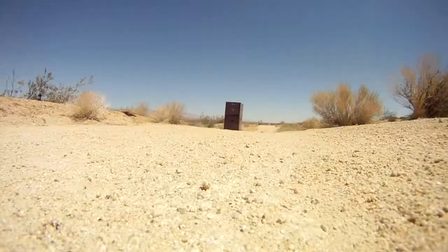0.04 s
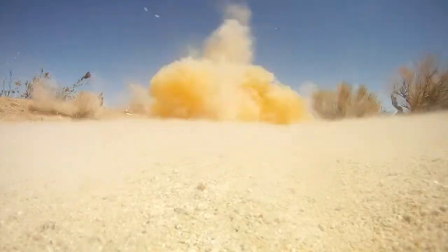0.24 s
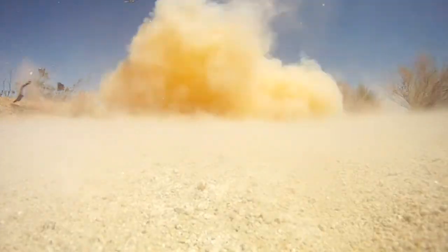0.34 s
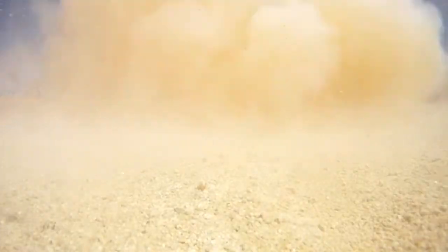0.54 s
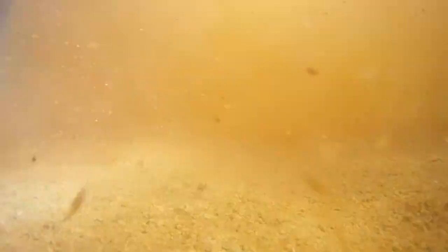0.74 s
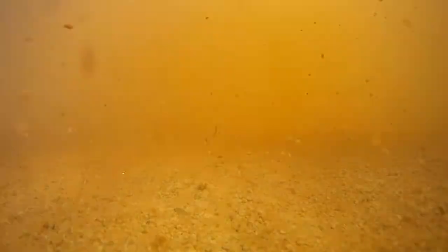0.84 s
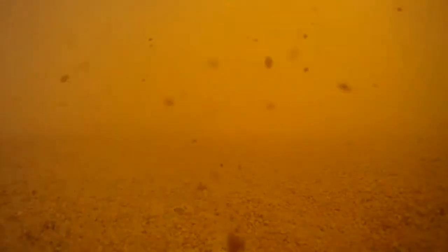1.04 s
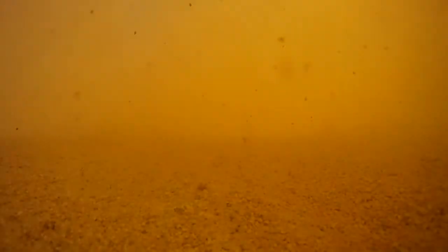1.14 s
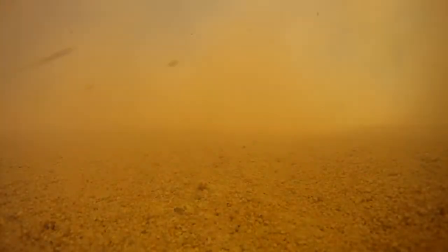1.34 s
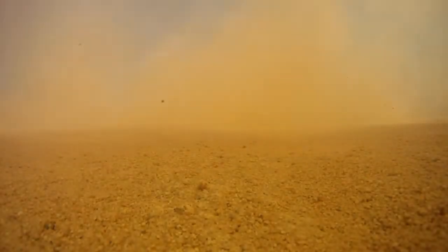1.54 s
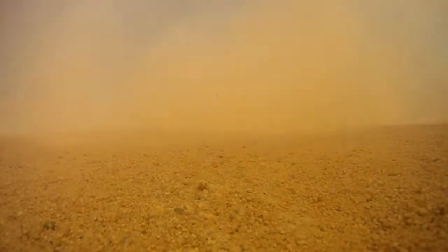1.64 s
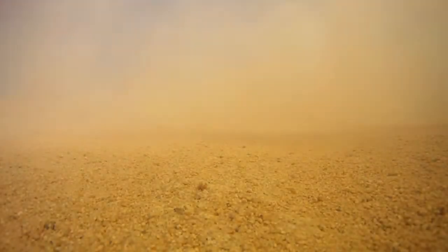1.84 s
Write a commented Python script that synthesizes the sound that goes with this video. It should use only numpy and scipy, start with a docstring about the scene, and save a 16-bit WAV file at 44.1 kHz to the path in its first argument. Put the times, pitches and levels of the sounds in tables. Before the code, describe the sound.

A sharp blast outdoors overloads a microphone on the ground a few metres away. A short rumble follows as dirt and small stones shower onto its housing with bright ticks and dull thumps, then die away.

```python
"""Explosion in the desert

A charge explodes in open desert, a few metres from a small cased camera on the ground. A sharp
crack and then the shock wave overload the microphone, and a rumble rolls away. Falling stones and
sand excite the resonant modes of the case, soft clods thump against it, a piece of metal rings
faintly, and the patter thins out."""
import sys
import numpy as np
from scipy import signal
from scipy.fft import rfft, irfft, next_fast_len
from scipy.io import wavfile

SR = 44100
rng = np.random.default_rng(int(sys.argv[2]) if len(sys.argv) > 2 else 0)


def inscribe(sig):
    """Save sig as 16-bit PCM at rate SR to the path in sys.argv[1].

    A 1-D sig is mono; a 2-D sig holds one channel per row.
    Samples are clipped to [-1, 1] before scaling.
    """
    pcm = np.round(np.clip(np.atleast_2d(sig).T, -1, 1) * 32767)
    wavfile.write(sys.argv[1], SR, pcm.astype(np.int16))


N = 83790
TIME = np.arange(N) / SR


def from_db(db):
    """Amplitude grows tenfold for every 20 dB."""
    return 10 ** (np.asarray(db) / 20)


def unit_rms(x):
    """Normalisation to a mean power of one."""
    return x / np.sqrt(np.mean(x ** 2) + 1e-20)


def envelope(curve):
    """Amplitude envelope through (seconds, dB) points, silent before the first."""
    return from_db(np.interp(TIME, *np.transpose(curve), left=-200))


def add(out, start, sound):
    """Superposition: a sound adds to the mix from its start in seconds."""
    i = int(start * SR)
    out[i:i + len(sound)] += sound[:N - i]


def colour(x, spectrum, treble_db=0, low_mid_db=0):
    """Minimum-phase filter of unit power through (Hz, dB) points, with treble and low-middle gains."""
    size = 2 * next_fast_len(len(x))
    octave = np.log2(np.maximum(np.fft.rfftfreq(size, 1 / SR), 1))
    hz, db = np.transpose(spectrum)
    corners = np.log2([200, 600, 1100, 2000, 3500, 6000])
    tone_db = np.interp(octave, corners, [0, low_mid_db, low_mid_db, 0, 0, treble_db])
    magnitude = unit_rms(from_db(np.interp(octave, np.log2(hz), db) + tone_db))
    cepstrum = irfft(np.log(magnitude))
    cepstrum[1:size // 2] *= 2  # folding onto positive time makes the filter causal
    cepstrum[size // 2 + 1:] = 0
    return irfft(rfft(x, size) * np.exp(rfft(cepstrum)))[:len(x)]


def resonator(impulses, hz, t60):
    """Damped oscillator: a unit impulse starts a unit sine that falls 60 dB in t60 seconds."""
    r, w = from_db(-60 / (t60 * SR)), 2 * np.pi * hz / SR
    return signal.lfilter([0, np.sin(w)], [1, -2 * r * np.cos(w), r * r], impulses + 1e-18)


def burst(t, hold, release):
    """Noise of set energy that holds, then decays exponentially."""
    shape = np.exp(-np.maximum(t - hold, 0) / release)
    noise = rng.standard_normal(len(t)) * shape
    return noise * np.std(shape) / np.std(noise)


# Spectrum of still desert air. Each row: frequency in Hz, relative level in dB.
AIR_SPECTRUM = [(25, -9.5), (120, -5.5), (400, -11), (1500, -20.5), (5000, -33), (16000, -42)]


def air():
    """Ambient noise: a faint, steady floor with most of its power at low frequencies."""
    return from_db(-60) * colour(rng.standard_normal(N), AIR_SPECTRUM)


# Course of the blast's rumble. Each row: time in seconds, level in dB.
RUMBLE_LEVELS = [(0.26, -49), (0.33, -50.5), (0.41, -41.5), (0.48, -37.5), (0.6, -40.5), (0.8, -50),
                 (0.95, -57), (1.1, -45), (1.35, -69), (1.9, -67)]
# Spectrum of the rumble. Each row: frequency in Hz, relative level in dB.
RUMBLE_SPECTRUM = [(20, -3), (42, 7), (66, -3), (130, -7), (300, -9.5), (700, -19), (2000, -27),
                   (4000, -51), (8000, -87)]


def rumble():
    """Amplitude-modulated low noise: the blast swells and fades as it rolls over open ground."""
    return envelope(RUMBLE_LEVELS) * colour(rng.standard_normal(N), RUMBLE_SPECTRUM)


# Modes of a piece of metal. Each row: frequency in Hz, time to fall 60 dB in seconds.
METAL_MODES = [(506, 0.41), (698, 0.39)]
# Knocks on it. Each row: start in seconds, lower mode's level in dB, upper mode's level in dB.
METAL_KNOCKS = [(0.265, -63, -45), (0.62, -34, -39.5), (0.925, -47, -42.5), (0.977, -57.5, -52),
                (1.184, -44.5, -31.5), (1.25, -34, -48), (1.39, -42, -49)]


def metal():
    """Free vibration: each knock excites two damped modes in a different balance."""
    out = np.zeros(N)
    for start, *levels_db in METAL_KNOCKS:
        for (hz, t60), db in zip(METAL_MODES, levels_db):
            decay = from_db(-60 * TIME / t60)
            add(out, start, from_db(db) * np.sin(2 * np.pi * hz * TIME) * decay)
    return out


# Modes of the case. Each row: frequency in Hz, relative level in dB, time to fall 60 dB in seconds.
CASE_MODES = [(1880, -8.5, 0.022), (2224, -4.5, 0.034), (2442, -2, 0.052), (2597, -1, 0.053),
              (3330, -2.5, 0.0094), (3647, -8, 0.034), (4630, -15.5, 0.03), (7150, -15, 0.015),
              (8300, -7.5, 0.028), (9525, -4.5, 0.04), (14670, -6, 0.043)]
# Broad response of the case to a contact. Each row: frequency in Hz, relative gain in dB.
CASE_RESPONSE = [(100, -22.5), (360, -30.5), (560, -12), (1100, -9.5), (1600, -3), (2550, 0.5), (3100, -6),
                 (3650, -2), (4150, -8), (5000, -8.5), (5950, -24), (6950, -12.5), (7900, -14.5),
                 (9400, -15.5), (10100, -16.5), (10900, -32), (12100, -78), (13300, -27), (14550, -16.5),
                 (15100, -22), (16000, -58)]
# Fall of sand and grit. Each row: time in seconds, level in dB.
SAND_LEVELS = [(0.27, -33.5), (0.32, -50.5), (0.41, -47), (0.495, -46), (0.53, -29.5), (0.6, -27),
               (0.7, -23.5), (0.735, -40.5), (0.78, -29.5), (0.83, -33), (0.905, -38.5), (0.93, -31),
               (0.96, -28.5), (1.07, -25), (1.1, -27), (1.17, -26), (1.21, -31.5), (1.26, -28.5),
               (1.32, -44), (1.42, -46), (1.58, -44), (1.75, -49), (1.9, -54.5)]


def sand(grains_per_s=900, spread_db=3, crumble_s=0.00079, detune=0.028):
    """Shot noise: grains crumble at random on five spots of the case, each ringing at its own pitches."""
    ticks, rings = np.zeros(N), np.zeros(N)
    spots = np.linspace(-1, 1, 5)
    for spot in spots:
        sizes = from_db(spread_db * np.minimum(rng.exponential(1, N), 4))
        grains = sizes * (rng.random(N) < grains_per_s / len(spots) / SR)
        impulses = grains * rng.choice([-1, 1], N)
        ticks += signal.fftconvolve(impulses, burst(TIME[:SR // 100], 0, crumble_s))[:N]
        for hz, db, t60 in CASE_MODES:
            gain = from_db(db - 1.5 * (hz > 5000))
            rings += gain * resonator(grains * rng.standard_normal(N), hz * (1 + detune * spot), t60)
    ticks = colour(ticks, CASE_RESPONSE, treble_db=1, low_mid_db=2)
    return envelope(SAND_LEVELS) * unit_rms(unit_rms(ticks) + from_db(2) * unit_rms(rings))


def contact(t, snap_delay_s=0.0007, tick_s=0.0007):
    """Impact excitation: a stone touches, snaps down a moment later and crumbles in uneven ticks."""
    snap = np.roll(burst(t, hold=0, release=0.00048), int(snap_delay_s * SR))
    smooth = burst(t, hold=0.00053, release=0.0031)
    tick_db = 4 * rng.standard_normal(len(t))
    ticks = smooth * from_db(tick_db[(t / tick_s).astype(int)])
    return ticks * np.std(smooth) / np.std(ticks) + from_db(4) * snap


# Stones striking the case. Each row: start in seconds, relative level in dB, treble score,
# low-middle score, favoured note in Hz, gain of the ringing in dB.
STONE_IMPACTS = [(0.279, -17, -8, 21, 2240, 0), (0.4101, -22, -26, 13, 2644, 2.5),
                 (0.4274, -27, -8, -17, 2630, 9), (0.4596, -21, -19, -17, 2350, -14),
                 (0.5053, -17, -16, -24, 2495, 0), (0.5112, -13, -8, -35, 2180, 0),
                 (0.5221, 4, -15.5, -26.5, 3630, -2.5), (0.538, -14, -4, -33, 3300, 6),
                 (0.54, -15, -6, -30, 3040, -8), (0.5471, -2.5, -9, -50, 2284, 3),
                 (0.5591, 4, -24, -32, 2380, -8), (0.573, -14, -11, -21, 2950, 9.5),
                 (0.5816, 0, -23, -30, 3230, -5), (0.5858, -2.5, -14, -40, 4450, -13),
                 (0.5889, -6.5, -16, -20, 3570, 4), (0.593, -2, -19, -24, 2410, 6.5),
                 (0.6006, -2.5, -6, -33, 3940, -3), (0.609, 8.5, -17, -21.5, 3590, -24),
                 (0.6116, 3, -14, -13, 2585, -2.5), (0.631, -13, -6, -9, 2620, 11),
                 (0.6506, 1.5, -21, -22, 2650, -2.5), (0.6625, -3, -14, -29, 3460, 0),
                 (0.6665, 2.5, -16, -30, 2606, -2.5), (0.6945, -10, -26, -28, 2220, 6),
                 (0.702, -4.5, -15, -41, 2780, 2), (0.7101, 0, -14, -25, 2520, -3),
                 (0.7134, -4, -16, -33, 2400, -21), (0.7381, -16, -12, -34, 2430, -7),
                 (0.7557, -14, -8, -18, 2570, -0.5), (0.7729, -0.5, -18.5, -58, 2640, -1.5),
                 (0.7863, -18, -12, -24, 2260, 5), (0.8153, -6.5, -8, -42, 2670, -21),
                 (0.8215, -13.5, -16, -30, 3450, -4), (0.8427, -7, -8, -14, 2420, 0),
                 (0.851, -5.5, -24, -27, 2695, 7), (0.8594, -6.5, -11, -17, 2285, 7),
                 (0.8634, -14.5, -27, -32, 2760, 11.5), (0.8862, -15.5, -17, -22, 2440, 9),
                 (0.8921, -17.5, -21, -36, 2680, 5), (0.9168, -7.5, -13, -69, 2420, -4),
                 (0.9254, -8.5, -18, -29, 2580, -10), (0.9762, -9, -33, -8, 1747, -4),
                 (0.9787, -4, -10, -19, 718, -8.5), (1.0087, -6, -14, -48, 2370, 5.5),
                 (1.019, -17, -16, -28, 2330, -8), (1.0339, 5.5, -25, -28, 3690, -3),
                 (1.045, -9.5, -16, -28, 2980, -1), (1.0582, -6.5, -29, -21, 2706, 7),
                 (1.069, -1, -12, -35, 2220, 2), (1.0779, -2, -18, -38, 2300, -13),
                 (1.081, -4, -8, -29, 3520, -7), (1.11, -7.5, -19, -38, 1920, -0.5),
                 (1.1211, -4.5, -9, -21, 2470, -17), (1.1401, -2.5, -30, -23, 2100, 4.5),
                 (1.154, -17.5, -11, 16, 2606, 16), (1.1657, 4.5, -9.5, -25, 2580, 2.5),
                 (1.1842, -10.5, -18, -6, 2050, 1), (1.2215, -11, -15, -15, 2570, 3.5),
                 (1.2494, 0, -7, -18.5, 2630, -5.5), (1.2626, -9.5, -19, -54, 2507, 2.5),
                 (1.3221, -7.5, -8.5, -13, 2524, 6.5), (1.3281, -12.5, -26, -17, 2520, -20),
                 (1.3506, -11, -2, -30, 3420, 2.5), (1.363, -10, -17, -14, 2240, 3),
                 (1.374, 3.5, -7.5, -40, 5150, -12), (1.3903, -16.5, -12, -12, 2655, 12.5),
                 (1.426, -18.5, -20, -18, 1820, -0.5), (1.4923, -4.5, -9.5, -26, 2470, 3),
                 (1.5109, -21.5, -13, -13, 2600, 6.5), (1.585, -19, -6, -53, 3430, -18),
                 (1.7262, -19, -19, -27, 2540, 0.5), (1.8388, -26, -21, -30, 2466, 5),
                 (1.8577, -16.5, -10, -30, 2473, -1.5)]


def stones(rise_s=0.0007, note_decay_s=0.0048, scatter_db=6):
    """Modal response: each stone crunches and sets the case ringing; the spot struck favours one note."""
    out, t = np.zeros(N), TIME[:SR // 10]
    hz, mode_db, t60 = np.transpose(CASE_MODES)[:, :, None]
    is_treble = hz > 5000
    detune = np.where(is_treble, 0.0197, 0.014)
    for start, db, treble, low_mid, note_hz, ring_db in STONE_IMPACTS:
        treble_db, low_mid_db = 0.42 * (treble + 18.5), 0.56 * (low_mid + 25.5)
        crunch = colour(contact(t), CASE_RESPONSE, treble_db, low_mid_db)
        gains = from_db(mode_db + scatter_db * rng.standard_normal(hz.shape) + treble_db * is_treble)
        struck_hz = hz * (1 + detune * rng.standard_normal(hz.shape))
        phase = 2 * np.pi * (struck_hz * t + rng.random(hz.shape))
        modes = gains / np.linalg.norm(gains) * np.sin(phase) * from_db(-60 * t / t60)
        note = from_db(1.5) * np.sin(2 * np.pi * note_hz * t) * np.exp(-t / note_decay_s)
        ringing = from_db(ring_db) * (modes.sum(0) + note)
        attack = np.minimum(t / rise_s, 1)
        add(out, start, from_db(db - 11.5) * attack * (crunch + ringing))
    return out


# The shock wave, its echoes and the clods. Each row: start, rise and fall in seconds, level in dB.
PRESSURE_PULSES = [(0.264, 0.0016, 0.0035, 8.5), (0.278, 0.0012, 0.0013, -21),
                   (0.4096, 0.0003, 0.00035, -13.5), (0.608, 0.0024, 0.0044, -3),
                   (0.7100, 0.0027, 0.0041, 5), (0.7753, 0.001, 0.0025, -4.5),
                   (0.8594, 0.00031, 0.0044, -2.5), (1.067, 0.00035, 0.0036, -23),
                   (1.1645, 0.0005, 0.0049, -20), (1.249, 0.0014, 0.0017, -27),
                   (1.3742, 0.00053, 0.0014, -22)]


def pressure_pulses():
    """A one-sided pressure pulse, rising faster than it falls, is heard as a thump; dust spatters too."""
    out, t = np.zeros(N), TIME[:SR // 20]
    for start, rise, fall, db in PRESSURE_PULSES:
        swell = np.sin(np.interp(t, [0, rise, rise + fall], [0, np.pi / 2, np.pi])) ** 2
        spatter = from_db(-28) * burst(t, hold=0, release=0.0021)
        add(out, start, from_db(db) * (spatter - swell))
    return out


# Spectrum of the explosion through the case. Each row: frequency in Hz, relative level in dB.
BLAST_SPECTRUM = [(100, -5.5), (500, -3.5), (900, -12), (2100, -2), (3700, -5.5), (4900, -3), (6000, -36),
                  (7500, -7.5), (9600, -6), (12000, -84), (14600, 0), (15800, -68)]
# The crack and the shock front. Each row: start in seconds, level in dB, hold and release in seconds,
# treble gain in dB, note of the shaken case in Hz, that note's relative level in dB.
BLAST_FRONTS = [(0.2441, -4.5, 0.0043, 0.0031, -3.5, 2834, -4),
                (0.2597, 1.5, 0.0058, 0.0014, -20, 1993, -5)]


def explosion():
    """Shock excitation: two broadband fronts, a few milliseconds each, shake a note from the case."""
    out, t = np.zeros(N), TIME[:SR // 10]
    for start, db, hold, release, treble_db, note_hz, note_db in BLAST_FRONTS:
        crack = colour(burst(t, hold, release), BLAST_SPECTRUM, treble_db)
        decay = np.exp(-np.maximum(t - hold, 0) / release)
        note = from_db(note_db) * np.sin(2 * np.pi * note_hz * t) * decay
        add(out, start, from_db(db) * (crack + note))
    return out


def scene():
    """Superposition: all sources sum at one microphone, the same in both channels."""
    pressure = explosion() + pressure_pulses() + stones() + sand() + metal() + rumble() + air()
    return np.tile(pressure, (2, 1))


def record(dry):
    """Saturation and band limiting: peaks flatten, and a low cut makes each pulse swing back."""
    overload, full_scale = 1.04, 0.85
    low_cut = signal.butter(1, 40, "high", fs=SR, output="sos")
    high_cut = signal.cheby2(16, 62, 16500, fs=SR, output="sos")
    saturated = dry / (1 + (dry / overload) ** 6) ** (1 / 6)
    clipped = np.clip(signal.sosfilt(low_cut, saturated), -full_scale, full_scale)
    return signal.sosfilt(high_cut, clipped)


dry = scene()
out = record(dry)
inscribe(out)
```